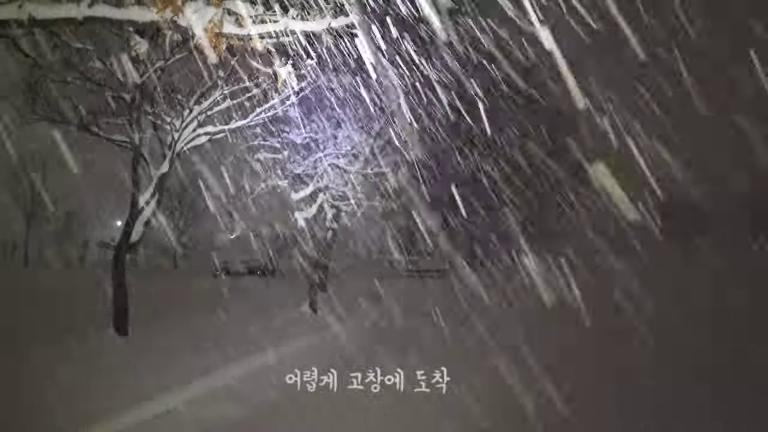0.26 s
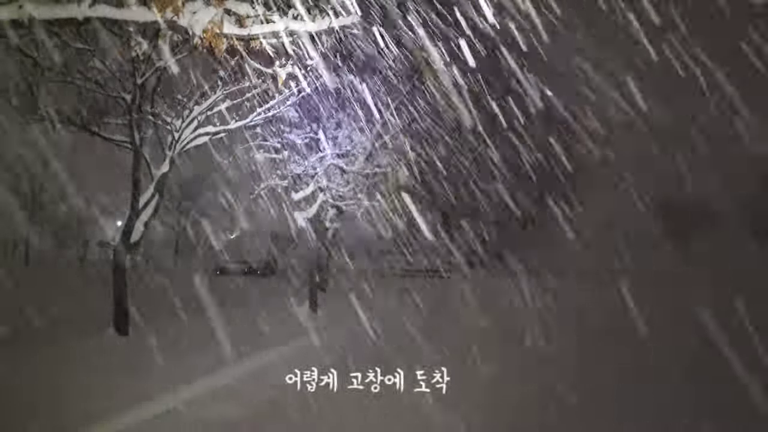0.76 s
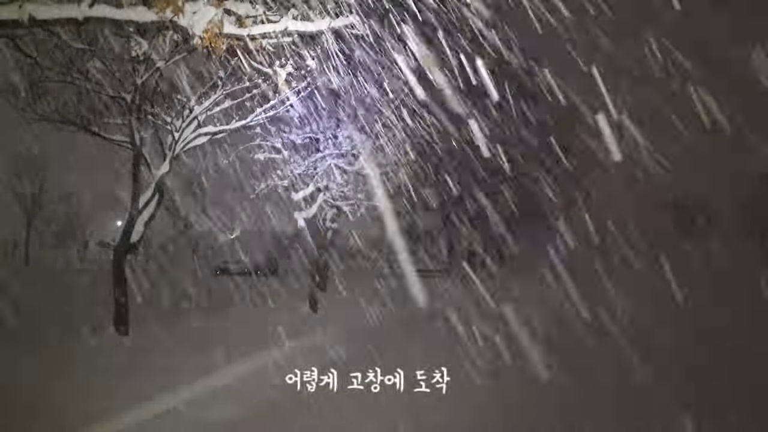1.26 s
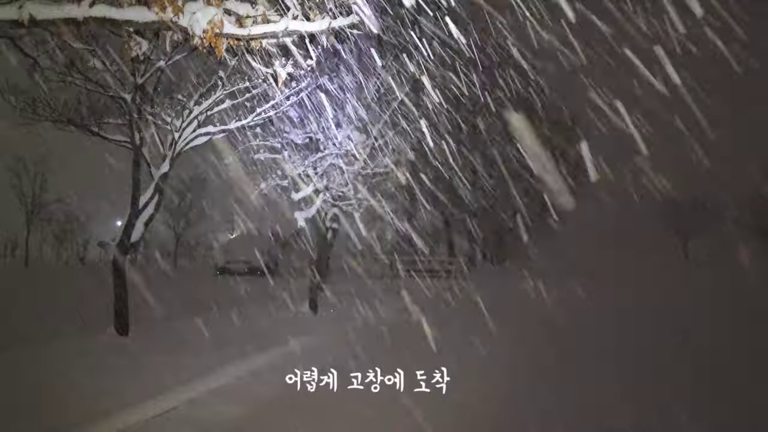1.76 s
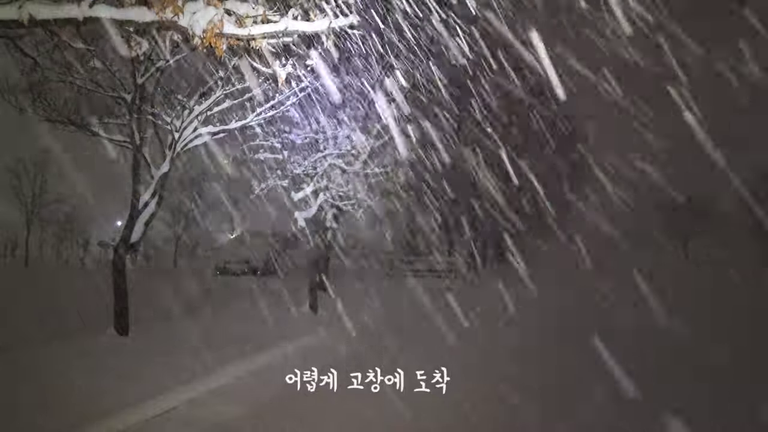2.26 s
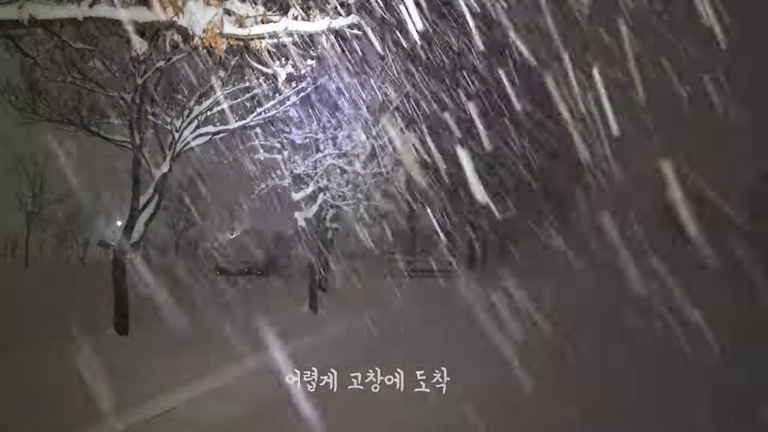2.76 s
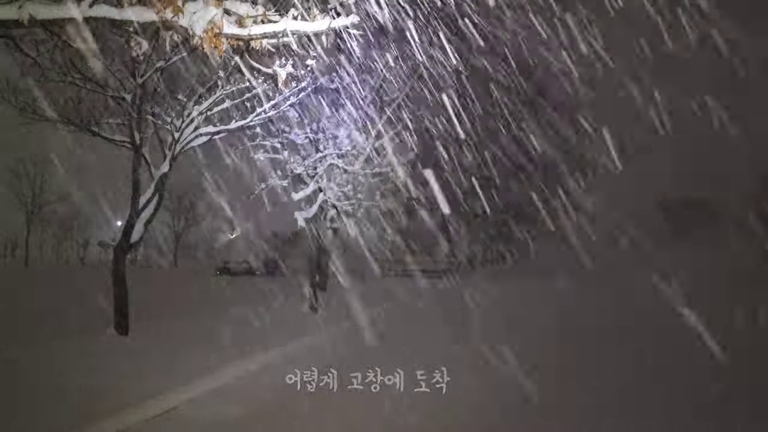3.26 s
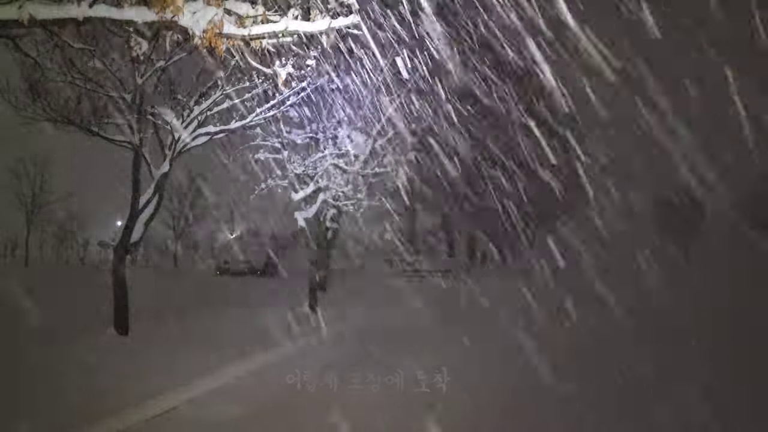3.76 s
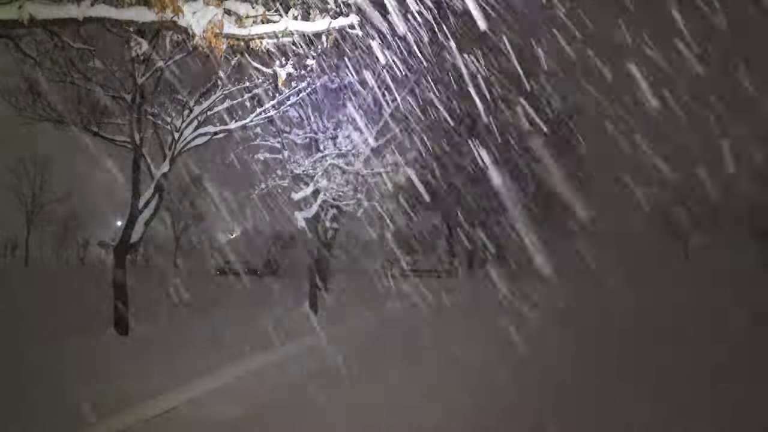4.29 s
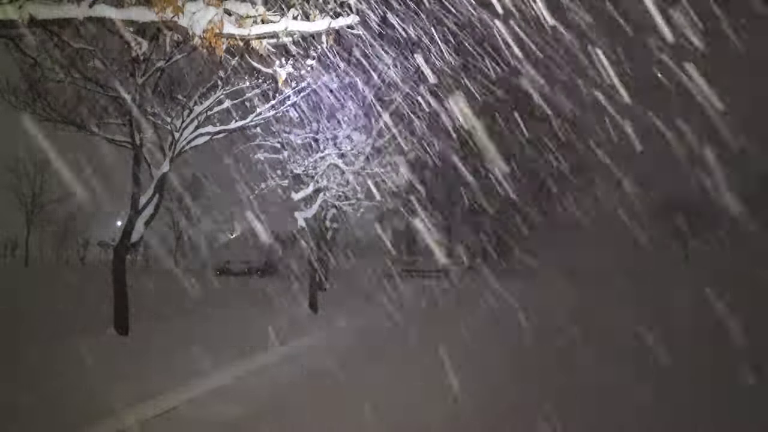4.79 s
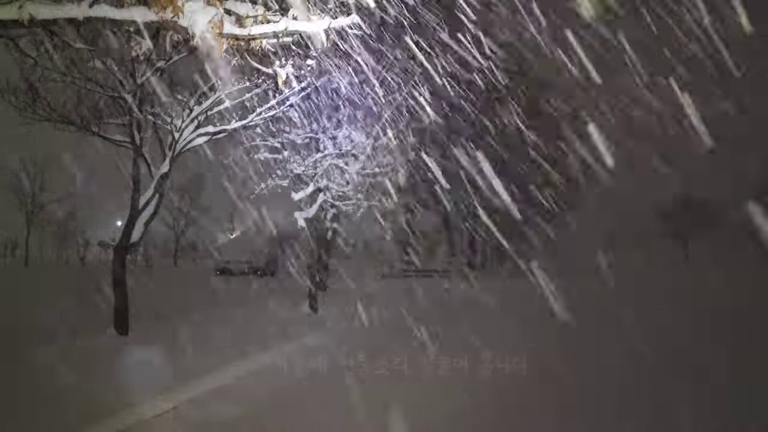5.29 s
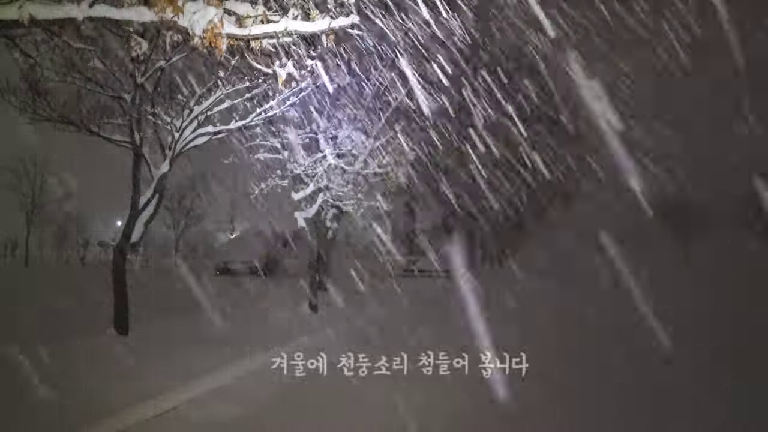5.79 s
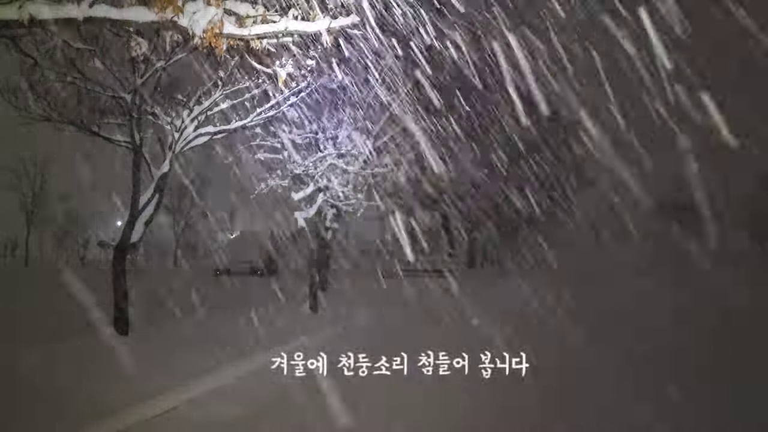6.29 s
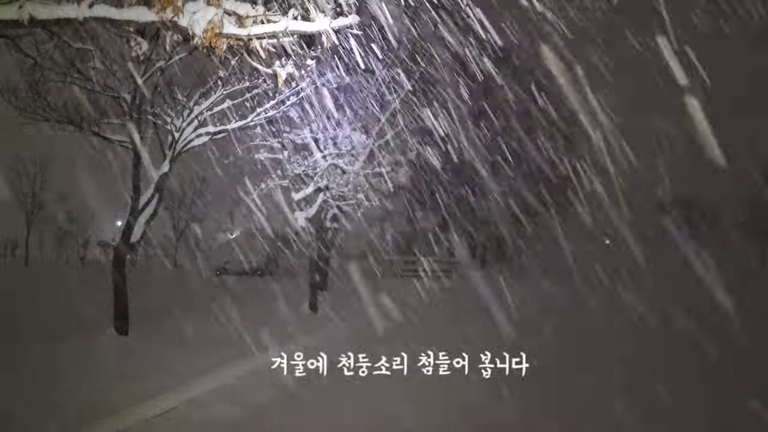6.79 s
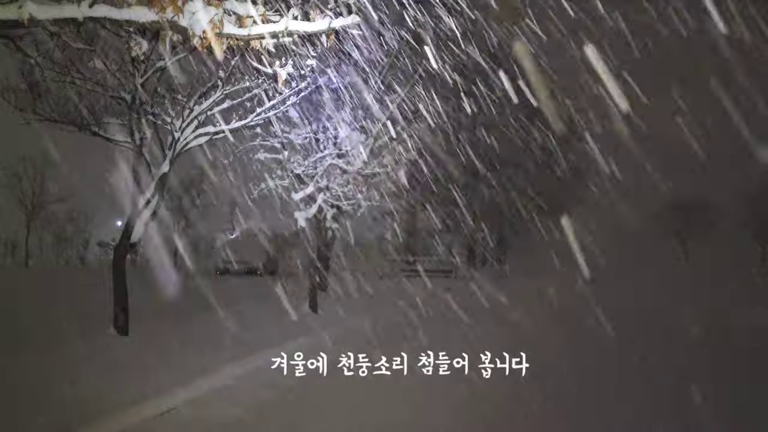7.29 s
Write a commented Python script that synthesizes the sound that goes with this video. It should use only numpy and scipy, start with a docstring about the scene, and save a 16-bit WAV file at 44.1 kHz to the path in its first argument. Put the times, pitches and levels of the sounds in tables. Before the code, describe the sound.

Icy pellets patter beside a faintly whining, rumbling idle; a sudden ragged clap of thunder breaks and fades in uneven, deepening peals.

```python
"""Thunder breaks over a snowy park at night and rolls away: coloured streams of random shocks, duller with
distance, under swinging claps and torn crackle. An engine, probably a parked car, idles to the left:
filtered noise and a firing tone, with fan resonances and thin whine tones. Snow hisses and ticks: noise,
short ringing grains and dry snaps. A light wind brushes the microphone: separate low noise at each port."""
import sys
import numpy as np
from scipy import signal
from scipy.fft import rfft, irfft, next_fast_len
from scipy.io import wavfile
from scipy.ndimage import uniform_filter1d, minimum_filter1d

SR = 44100
rng = np.random.default_rng(int(sys.argv[2]) if len(sys.argv) > 2 else 0)


def unload_wav(signal):
    """Save mono or channel-first audio to the path in sys.argv[1] as 16-bit WAV at rate SR, clipped to [-1, 1]."""
    wavfile.write(
        sys.argv[1],
        SR,
        np.round(np.clip(np.atleast_2d(signal).T, -1, 1) * 32767).astype(np.int16),
    )


N = 332909
TIME = np.arange(N) / SR
HZ = np.fft.rfftfreq(N, 1 / SR)

# wind spectrum: hz, gain_db
WIND_COLOUR = [(12, -0.5), (35, 6), (55, -12), (100, -11), (250, 1), (450, 5), (800, -42), (2000, -64)]
WIND_DB = -67.5

# hiss of falling snow: hz, gain_db
HISS_COLOUR = [(500, -29), (850, -7.5), (1350, -2.5), (1470, -1.5), (1600, -7.5), (1740, -5), (2140, -5.5),
               (2970, -9), (3400, -9), (5070, -15), (7050, -12), (7350, -8), (7700, -10.5), (10600, -18),
               (15500, -16)]
HISS_DB = -64.5
# snow tick spectrum: hz, gain_db
TICK_COLOUR = [(800, -11.5), (2300, -9.5), (3900, 5), (5200, -1.5), (7300, 1.5), (9000, 3), (10700, -11.5),
               (12000, -5.5), (15500, -14)]
# flurries of fine snow at set times: start_s, length_s, level_db
FLURRIES = [(0.155, 0.04, -63), (0.956, 0.11, -66), (1.427, 0.028, -67), (2.025, 0.034, -63),
            (2.25, 0.038, -67.5), (2.65, 0.068, -71), (2.798, 0.039, -62.5), (3.423, 0.029, -61),
            (5.238, 0.0095, -57), (5.402, 0.015, -65)]
SPRINKLE_DB, FLURRY_DB, FLURRY_SPREAD_DB, FLURRY_DECAY_S = -69.5, -62, 7, 0.016
GUST_S, GUST_WIDTH_S, GUST_DB = 1.07, 0.1, 1.5  # drives the fine snow harder for a moment
SNOW_EASE_DB_PER_S = 0.1
# large pellets landing close by: start_s, level_db (before trim and colour), pitch_hz,
# ring_db (re snap), pan_db (left minus right)
PELLETS = [(0.2104, -41, 7500, -18, 6), (0.2965, -42, 4670, -4, 0), (0.556, -45, 7200, -16, 11),
           (0.959, -44, 3300, -4, 1), (0.9705, -40, 4180, -5, 3), (1.0145, -45, 4500, -14, 1),
           (1.041, -49, 8400, -14, 8), (1.44, -44, 2980, -12, 1), (1.5062, -41.5, 3780, -2, 0),
           (1.7713, -39, 5800, -4, 0), (2.036, -45, 8000, -12, 10), (2.171, -44, 3080, -5, 4),
           (2.271, -52, 4200, -14, 8), (2.6806, -36.5, 3400, -2, 0), (2.817, -41, 4400, -3, 2),
           (3.413, -46, 6200, -14, 6), (3.559, -44, 4000, -16, 13), (3.5997, -41, 3900, -11, 7),
           (3.846, -43, 5900, -14, 9), (3.877, -42, 8300, -12, -1), (4.331, -45, 6400, -7, 8),
           (4.573, -55, 7450, -16, 9), (4.953, -47, 8200, -12, 6), (5.2325, -45, 3660, -7, 1),
           (5.248, -47, 4300, -11, 2), (5.35, -46, 7300, -20, 9), (5.413, -50, 2900, -14, 1),
           (6.146, -43, 3600, -8, 3), (6.745, -48, 3100, -16, 10), (7.0025, -36.5, 3600, -7, 0),
           (7.1, -45, 7070, -6, -2), (7.405, -38.5, 3620, -3, 0)]
# pellet snap spectrum: hz, gain_db
SNAP_COLOUR = [(800, -14), (2300, 3), (3900, 1), (5200, -1), (8000, 4.5), (10700, -10), (15500, -3)]
# small pellets, levels before trim and colour
SMALL_DB, SMALL_SPREAD_DB, SMALL_HZ, SMALL_OCTAVES, SMALL_RING_DB, SMALL_PAN_DB = -51, -4.5, 4860, 0.5, -12, 5

# exhaust rumble spectrum: hz, gain_db
EXHAUST_COLOUR = [(12, -72), (20, -25.5), (27, -44), (46, -10), (69, -1), (82, -6), (98, -15), (124, -13),
                  (139, -20), (172, -12.5), (265, -23), (294, -23), (363, -30), (403, -23.5), (460, -47.5),
                  (600, -80), (1010, -120)]
EXHAUST_DB = -41.04
# swells of the engine drone: centre_s, width_s, level_db
SURGES = [(0.19, 0.017, -45), (1.33, 0.032, -40), (1.43, 0.018, -43), (2.035, 0.073, -38),
          (2.785, 0.042, -36.5), (2.89, 0.029, -36.5), (3.27, 0.025, -39)]
FIRING_HZ, FIRING_DB = 65.34, -54.5
# fan resonances: pitch_hz, half_width_hz, gain_db
FAN_RESONANCES = [(565, 35, -0.5), (725.5, 60, -1), (978, 28, -7), (1230, 19, -11), (1486, 29, -1.5),
                  (1786, 28, -7), (2477, 34, -22.5), (2990, 15, -15.5)]
FAN_DB = -60.0
# whine of the spinning parts: pitch_hz, level_db (at the start)
WHINE = [(1682, -71.5), (1762, -67.5), (2485, -82.5), (2885, -82), (2966, -83), (3047, -75.5), (3208, -81),
         (3607, -78.5), (4007, -90)]
RUMBLE_LAG_S, FAN_LAG_S = 0.00022, 0.00037

STRIKE_S, HOLD_S = 3.789, 0.53  # first shock front; level held before the roll fades
# thunder from the near end of the channel: hz, gain_db
NEAR_COLOUR = [(22, -25), (65, -16), (150, 1.5), (250, -5.5), (305, -16), (405, 4.5), (490, -4.5),
               (640, -11), (890, -21.5), (985, -15), (1100, -21), (2400, -31), (3800, -47.5), (6000, -74)]
# thunder from the far end of the channel: hz, gain_db
FAR_COLOUR = [(22, -19), (65, -5), (125, 1), (165, -5.5), (255, -1.5), (315, -12), (405, -1.5), (590, -12),
              (760, -10.5), (950, -17), (1180, -20), (1450, -21), (1650, -28), (2100, -27.5), (3800, -51),
              (6000, -64.5)]
# hollow ring of the roar: time_s, pitch_hz
ROAR_PITCH = [(3.79, 462), (3.83, 402), (3.9, 434), (3.98, 387), (4.015, 487), (4.06, 383), (4.14, 406),
              (4.19, 450), (4.23, 426), (4.33, 431), (4.39, 400), (4.5, 435), (4.57, 376), (4.68, 430)]
# deepest rumble: level_db, fade_db_per_s
DEEP = (-44, 4.8)
# boom of the longest shocks: level_db, fade_db_per_s
BOOM = (-33.5, 6.15)
# low middle shocks: level_db, fade_db_per_s
BODY = (-36.5, 7.12)
# high middle shocks: level_db, fade_db_per_s
CRASH = (-40.5, 5.45)
# crackle of short shocks: level_db, fade_db_per_s
CRACKLE = (-51.5, 6.64)
BODY_SHARE, CRASH_SHARE = 0.19, 0.072  # share of the boom's swell; the rest follows the crackle
# branches whose shocks arrive together: start_s, length_s, deep_swell_db, boom_swell_db, crackle_swell_db
PEALS = [(3.793, 0.042, 9, 1.5, 3.5), (3.848, 0.074, 3, 6.5, 1.5), (3.934, .04, 4.5, -1, 0.5),
         (4.008, 0.078, 4, 4, 3.5), (4.088, 0.076, 9, 3.5, 4.5), (4.177, 0.035, 13, 12.5, 3),
         (4.211, 0.037, 12, 6.5, 7.5), (4.263, 0.088, 5, 6, 2), (4.353, 0.03, 0, 7.5, 4.5),
         (4.425, 0.03, 0, -1.5, -8), (4.516, 0.04, 13, 5.5, 2.5), (4.64, 0.049, 6, 9, 4),
         (4.728, 0.1, 10, 8, 3.5), (4.88, 0.038, 8, 11.5, 3), (4.963, 0.077, 8, 10.5, 4.5),
         (5.06, 0.069, 9, 9.5, 3.5), (5.178, 0.071, -13, 6.5, 0), (5.317, 0.27, 3, 1.5, 1.5),
         (5.647, 0.096, -1, 13, 4), (5.768, 0.11, 12, 9.5, 3.5), (5.891, 0.085, 15, 6, 2),
         (5.994, .04, 12.5, 2, 2), (6.087, 0.07, 10, 1, 3.5), (6.18, 0.036, 17, 2, 3),
         (6.255, 0.038, 15, -3, 1), (6.34, 0.1, 10.5, 3.5, 1.5), (6.444, 0.1, 4, 3, 2),
         (6.59, 0.052, 6, -1, 1.5), (6.95, 0.19, 1, 4.5, 1.5), (7.176, 0.046, 2, 10, 2.5),
         (7.278, 0.037, 7, 5, 2), (7.346, 0.021, 10, 15.5, 6), (7.419, 0.091, 1, 16, 3)]
PEAL_ATTACK_S, PEAL_RELEASE_S = 0.016, 0.021
# level changes between the peals, mostly lulls: centre_s, width_s, change_db
LULLS = [(3.99, 0.031, -2.5), (4.09, 0.014, -0.5), (4.5, 0.033, -2), (4.62, .025, -0.5), (4.865, 0.024, 2),
         (4.948, 0.012, 4.5), (5.045, .012, -2), (5.515, .015, -1.5)]
# tearing crackle of many sharp fronts: start_s, length_s, level_db
TEARS = [(3.802, 0.022, -48), (3.83, 0.064, -49), (4.016, 0.018, -46), (4.06, 0.013, -52),
         (4.094, 0.08, -41.5), (4.196, 0.0082, -38), (4.215, 0.047, -37), (4.655, .02, -39.5),
         (4.778, 0.029, -38), (4.917, 0.015, -43), (4.995, .04, -54), (5.764, 0.11, -50), (6.1, 0.055, -53)]
# tearing crackle spectrum: hz, gain_db
TEAR_COLOUR = [(400, -14), (1000, 18), (2200, 1), (3300, -14), (4300, -29), (6000, -39), (9000, -59)]
# heavy shock fronts: start_s, level_db (before trim, echo and filter), pitch_hz, swell_s
CLAPS = [(3.793, -26, 466, 0.0034), (3.816, -19, 190, 0.0018), (3.849, -21, 126, 0.0051),
         (3.881, -19, 133, 0.0046), (4.014, -24, 570, 0.0037), (4.028, -21.5, 448, 0.0067),
         (4.055, -20.5, 403, 0.008), (4.106, -15, 400, 0.011), (4.128, -16, 412, 0.0094),
         (4.194, -11.5, 141, 0.0044), (4.214, -12, 160, 0.0069), (4.383, -19, 390, 0.0043),
         (4.653, -17.5, 208, 0.0077), (4.732, -23, 420, 0.0035), (4.771, -19, 220, 0.0068),
         (4.794, -14.5, 237, 0.0063), (4.898, -25, 190, 0.0022), (4.910, -14.5, 239, 0.0046),
         (4.969, -20, 170, 0.0015), (5.014, -23, 330, 0.0028), (5.112, -19.5, 240, 0.0044),
         (5.668, -23, 191, 0.01), (5.718, -21.5, 163, 0.004), (5.768, -25.5, 680, 0.0023),
         (5.829, -19, 175, 0.0026), (5.954, -29, 202, 0.0065), (6.285, -36, 380, 0.0056),
         (7.363, -28, 129, 0.0059), (7.474, -34.5, 229, 0.012)]


def gain_of(db):
    """Decibels to amplitude."""
    return 10 ** (np.asarray(db) / 20)


def evened(x):
    """Scales to an rms of one."""
    return x / np.sqrt(np.mean(x ** 2) + 1e-20)


def colour(points):
    """Gain at every frequency, from (hz, gain_db) points joined on a log axis."""
    hz, db = np.transpose(points)
    return gain_of(np.interp(np.log(HZ + 1), np.log(hz + 1), db))


def filtered(x, gain):
    """Applies a gain given at every frequency."""
    size = next_fast_len(N + 4096)
    padded_gain = np.interp(np.fft.rfftfreq(size, 1 / SR), HZ, gain)
    return irfft(rfft(x, size) * padded_gain, size)[..., :N]


def below(hz):
    """Gain of a steep crossover that keeps what lies under hz."""
    return 1 / (1 + (HZ / hz) ** 8)


def drift(per_s):
    """Smooth random curve of rms one that changes about per_s times a second."""
    return evened(filtered(rng.standard_normal(N), np.exp(-(HZ / per_s) ** 2)))


def steadied(x, span_s):
    """Divides out the running level, leaving the grain finer than span_s."""
    size = max(int(span_s * SR), 2)
    power = uniform_filter1d(uniform_filter1d(x ** 2, size), size)
    return x / np.sqrt(abs(power) + 1e-20)


def impacts(per_s, spread_db):
    """Random clicks of either sign; a few are much larger, or smaller if spread_db is negative."""
    size = gain_of(spread_db * np.minimum(rng.exponential(1, N), 4))
    return size * rng.choice([-1, 1], N) * (rng.random(N) < per_s / SR)


def add(mix, s, sound):
    """Adds a sound to the mix at time s."""
    part = mix[..., max(round(s * SR), 0):][..., :sound.shape[-1]]
    part += sound[..., :part.shape[-1]]


def held(s, length, attack_s, release_s):
    """Envelope that rises at time s, holds and decays exponentially."""
    rise = np.clip((TIME - s) / attack_s, 0, 1)
    return rise * np.exp(-np.maximum(TIME - s - length, 0) / release_s)


def bump(s, width):
    """Smooth swell centred on time s."""
    return np.exp(-((TIME - s) / width) ** 2)


def panned(db):
    """Left and right gains that differ by db."""
    return gain_of([[db / 2], [-db / 2]])


def resonate(x, hz, width_hz):
    """Resonance of gain one that follows the curve hz: shift to zero, smooth, shift back."""
    turn = np.exp(2j * np.pi * np.cumsum(hz) / SR)
    r = np.exp(-np.pi * width_hz / SR)
    return 2 * (turn * signal.lfilter([1 - r], [1, -r], x / turn + 1e-18)).real


def from_left(x, lag_s):
    """A sound from the left reaches the right ear a little later."""
    return np.array([x, np.interp(TIME - lag_s, TIME, x)])


def wind(gust_db=2):
    """A faint, lumpy breeze brushes each port with its own noise."""
    brush = evened(filtered(rng.standard_normal((2, N)), colour(WIND_COLOUR)))
    return gain_of(WIND_DB + gust_db * drift(per_s=3)) * brush


def flurries(count=44, attack_s=0.004):
    """Strength of the fine snow: steady sprinkle, flurries at set times, brief ones at uneven intervals."""
    power, t = np.full(N, gain_of(SPRINKLE_DB) ** 2), np.arange(SR // 4) / SR
    starts = (np.arange(count) + rng.uniform(-1.1, 1, count)) * TIME[-1] / count
    for s, size in zip(starts, rng.uniform(-1, 1, count)):
        burst = gain_of(FLURRY_DB + FLURRY_SPREAD_DB * size) * np.exp(-t / FLURRY_DECAY_S)
        add(power, s, burst ** 2)
    for s, length, db in FLURRIES:
        power += (gain_of(db) * held(s, length, attack_s, FLURRY_DECAY_S)) ** 2
    return np.sqrt(power)


def snow(grains_per_s=600, spread_db=3, clump_db=2, grain_s=0.00074, pan_db=2.0, ring=0.18, ring_s=0.01,
         fine_db=2, hiss_top_db=-2, breeze_db=2.0, patter_db=1.5):
    """Far flakes blur into a soft hiss; near grains crunch and ring in little flurries."""
    top = 1 - below(10000)
    hiss_gain = colour(HISS_COLOUR) * gain_of(hiss_top_db * top)
    hiss = evened(filtered(rng.standard_normal((2, N)), hiss_gain))
    hiss = hiss * gain_of(HISS_DB + breeze_db * drift(per_s=23) + patter_db * drift(per_s=110))
    clumps, t = gain_of(clump_db * drift(per_s=40)), np.arange(500) / SR
    grains = np.zeros((2, N))
    spots_hz = np.linspace(3300, 9500, 18) + rng.uniform(-180, 180, 18)
    for hz in spots_hz:
        # each landing spot sounds different, and different at each ear
        crunch = rng.standard_normal((2, len(t))) * np.exp(-t / grain_s)
        crunch += ring * np.sin(2 * np.pi * (hz * t + rng.random((2, 1)))) * np.exp(-t / ring_s)
        landings = clumps * impacts(grains_per_s / len(spots_hz), spread_db)
        grains += signal.oaconvolve(landings[None], crunch, axes=1)[:, :N]
    grains = evened(filtered(grains, colour(TICK_COLOUR) * gain_of(fine_db * top)))
    return (hiss + flurries() * grains) * panned(pan_db)


def crystals(level_db=-57.0, hits_per_s=13, flurry_hits_per_s=200, spread_db=3, bright_hz=5000, pan_db=6,
             flurry_share=0.8, attack_s=0.004):
    """Single ice crystals strike each port with tiny dry clicks, thickest in the flurries at set times."""
    hits = np.array([impacts(hits_per_s, spread_db) for port in range(2)])
    in_flurry = sum(held(s, length, attack_s, FLURRY_DECAY_S) for s, length, db in FLURRIES)
    flurry_hits = np.array([impacts(flurry_hits_per_s, spread_db) for port in range(2)])
    hits += flurry_share * in_flurry * flurry_hits
    return gain_of(level_db) * filtered(hits, 1 - below(bright_hz)) * panned(pan_db)


def small_pellets(count=24):
    """Random landings of lighter pellets, in the columns of PELLETS."""
    size, pitch, side = np.clip(rng.standard_normal((count, 3)), -1, 1).T
    times = (np.arange(count) + rng.random(count)) * TIME[-1] / count
    levels_db = SMALL_DB + SMALL_SPREAD_DB * size
    pitches_hz = SMALL_HZ * 2 ** (SMALL_OCTAVES * pitch)
    return list(zip(times, levels_db, pitches_hz, np.full(count, SMALL_RING_DB), SMALL_PAN_DB * side))


def pellets(trim_db=-1, snap_s=0.000075, ring_s=0.0013, crunch_db=-15, crunch_s=0.0018, crumbs_db=-27,
            crumbs_s=0.015):
    """A pellet lands with one dry snap, briefly rings what it hits, and its crumbs patter after it."""
    out, t = np.zeros((2, N)), np.arange(2048) / SR
    crumble = gain_of(crunch_db) * np.exp(-t / crunch_s) + gain_of(crumbs_db) * np.exp(-t / crumbs_s)
    for s, db, hz, ring_db, pan in PELLETS + small_pellets():
        decay = np.exp(-t / snap_s) + gain_of(ring_db) * np.exp(-t / ring_s)
        knock = np.cos(2 * np.pi * hz * t) * decay
        tick = knock / knock[0] + crumble * rng.standard_normal((2, len(t)))
        add(out, s, gain_of(db + trim_db) * panned(pan) * tick)
    return filtered(out, colour(SNAP_COLOUR))


def fan(waver=0.00124, blur_hz=8, flutter_db=2.0, echo_db=-9, pan_db=3.0, ease_db_per_s=0.4, sway=0.012,
        swell_db=1.64):
    """Cooling air excites resonances that sway and swell in the wind; spinning parts whine thinly."""
    air = np.zeros((3, N))  # one direct path, two echo paths
    swayed_s = np.cumsum(1 + sway * drift(per_s=6)) / SR
    for hz, width, db in FAN_RESONANCES:
        resonance = gain_of(db) / (1 + ((HZ - hz) / width) ** 2) ** 1.54
        air += filtered(rng.standard_normal((3, N)), resonance) * gain_of(swell_db * drift(per_s=3.6))
    air = gain_of(FAN_DB) * evened(np.array([np.interp(swayed_s, TIME, path) for path in air]))
    shaft_s, whine = np.cumsum(1 + waver * drift(per_s=5.1)) / SR, np.zeros(N)
    for hz, db in WHINE:
        turns = hz * shaft_s + np.cumsum(blur_hz * drift(per_s=29.0)) / SR
        level_db = db + flutter_db * drift(per_s=18) - ease_db_per_s * TIME
        whine += gain_of(level_db) * np.sin(2 * np.pi * turns)
    direct = from_left(air[0] + np.sqrt(2) * whine, FAN_LAG_S) * panned(pan_db)
    return direct + gain_of(echo_db) * air[1:]


def exhaust(hunting=0.032, flutter_db=4):
    """Lumpy exhaust noise around an uneven firing tone that now and then swells into a drone."""
    noise = filtered(rng.standard_normal(N), colour(EXHAUST_COLOUR))
    puffs = gain_of(EXHAUST_DB) * steadied(noise, span_s=0.18)
    turns = np.cumsum(FIRING_HZ * (1 + hunting * drift(per_s=11.0))) / SR
    surges = sum(gain_of(db) * bump(s, width) for s, width, db in SURGES)
    strength = gain_of(FIRING_DB + flutter_db * drift(per_s=6.9)) + surges
    firing = strength * np.sqrt(2) * np.sin(2 * np.pi * turns)
    return from_left(puffs + firing, RUMBLE_LAG_S)


def tears(cracks_per_s=450, spread_db=1.5, attack_s=0.0014, release_s=0.016, scatter_s=0.003):
    """Ragged bursts of separate sharp cracks, each smeared a little by the trees."""
    bursts = sum(gain_of(db) * held(s, length, attack_s, release_s) for s, length, db in TEARS)
    t = np.arange(SR // 100) / SR
    cracks = np.zeros(N)
    for path in rng.standard_normal((4, len(t))) * np.exp(-t / scatter_s):
        cracks += signal.oaconvolve(impacts(cracks_per_s / 4, spread_db), path)[:N]
    return bursts * steadied(filtered(cracks, colour(TEAR_COLOUR)), span_s=0.037)


def claps(soft_hz=1300, sag=0.039, steep=0.24, uneven=0.063, trim_db=-1, echo_db=-11, echo_s=0.037):
    """Broadside channel merges its shocks into one steep push of a few cycles; trees throw it back."""
    out, t = np.zeros(N), np.arange(SR // 10) / SR
    waver = 1 + uneven * drift(per_s=88)
    for s, db, hz, swell_s in CLAPS:
        age = t / swell_s
        pitch_hz = hz * np.exp(-sag * (age - 1)) * np.interp(s + t, TIME, waver)
        turn = 2 * np.pi * np.cumsum(pitch_hz) / SR
        swell = (age * np.exp(1 - age)) ** 2
        wave = swell * np.sin(turn + steep * swell * np.sin(turn))
        add(out, s, gain_of(db + trim_db) * wave / abs(wave).max())
    late = TIME[:SR // 2] / echo_s
    trees = rng.standard_normal(len(late)) * late * np.exp(-late)
    echo = signal.oaconvolve(out, trees / np.linalg.norm(trees))[:N]
    return filtered(out + gain_of(echo_db) * echo, 1 / (1 + (HZ / soft_hz) ** 2))


def peals(lull_share=0.53):
    """Swells in dB of deep rumble, boom and crackle: up in peals; lulls move the crackle least."""
    swell = np.zeros((3, N))
    for s, length, *swell_db in PEALS:
        swell = np.maximum(swell, np.outer(swell_db, held(s, length, PEAL_ATTACK_S, PEAL_RELEASE_S)))
    lulls = sum(db * bump(s, width) for s, width, db in LULLS)
    return swell + np.outer([1, 1, lull_share], lulls)


def roll(shocks_per_s=2000, spread_db=-0.5, edge_db=-13, steepen=0.65, rise_s=0.0054, air_hz=2400,
         air_db_per_s=2, near_s=4.13, far_s=5.05, lumps_db=0.4, roar_db=3, roar_width_hz=110,
         wander_db_per_s=0.15):
    """Each kink of the lightning channel sends a small shock; they arrive as one dense, swelling stream."""
    shocks = impacts(shocks_per_s, spread_db)
    roar_hz = np.interp(TIME, *np.transpose(ROAR_PITCH))
    roar = resonate(impacts(shocks_per_s, spread_db), roar_hz, roar_width_hz)
    roar = resonate(roar, roar_hz, roar_width_hz)
    near = filtered(shocks, colour(NEAR_COLOUR)) + gain_of(roar_db) * roar
    # sound comes from ever farther up the channel, and the air takes its treble
    distance = np.clip((TIME - near_s) / max(far_s - near_s, .01), 0, 1)
    stream = (1 - distance) * near + distance * filtered(shocks, colour(FAR_COLOUR))
    dull = filtered(stream, 1 / (1 + (HZ / air_hz) ** 4))
    stream = dull + (stream - dull) * gain_of(-air_db_per_s * np.maximum(TIME - STRIKE_S, 0))
    # each size of shock swells with the peals and fades at its own pace
    fading_s = np.maximum(TIME - STRIKE_S - HOLD_S, 0)
    deep, low, high = peals()
    swells = [(DEEP, deep)]
    for size, share in zip([BOOM, BODY, CRASH, CRACKLE], [1, BODY_SHARE, CRASH_SHARE, 0]):
        swells.append((size, share * low + (1 - share) * high))
    levels = []
    for (db, fade), swell in swells:
        wander = wander_db_per_s * fading_s * drift(per_s=27)  # wind, more with distance
        levels.append(db - fade * fading_s + swell + wander)
    # strong shocks keep steeper fronts: the loudest crackle gains a bright edge
    crackle = levels[-1]
    levels.append(crackle + steepen * (crackle - crackle.max()) + edge_db)
    splits = [below(hz) for hz in (105, 300, 650, 1500, 3300)]
    bands = np.diff([0 * HZ, *splits, 1 + 0 * HZ], axis=0)
    out = np.zeros(N)
    for band, level in zip(bands, levels):
        out += gain_of(level) * steadied(filtered(stream, band), span_s=0.056)
    return out * gain_of(lumps_db * drift(per_s=17)) * np.clip((TIME - STRIKE_S) / rise_s, 0, 1)


def scene():
    """Thunder ahead, engine to the left, snow and light wind all around."""
    snowfall_db = GUST_DB * bump(GUST_S, GUST_WIDTH_S) - SNOW_EASE_DB_PER_S * (TIME - TIME.mean())
    weather = wind() + gain_of(snowfall_db) * snow() + crystals() + pellets()
    engine = fan() + exhaust()
    thunder = tears() + claps() + roll()
    return weather + engine + thunder


def record(dry, right_top_db=-3, ceiling_db=-10, edge_hz=15750):
    """Right port duller at the very top; a limiter rounds off the loudest claps; then a band limit."""
    top = 1 - below(10500)
    ports = np.array([dry[0], filtered(dry[1], gain_of(right_top_db * top))])
    room = np.minimum(gain_of(ceiling_db) / (abs(ports).max(axis=0) + 1e-9), 1)
    ports = ports * uniform_filter1d(minimum_filter1d(room, size=400), size=400)
    band_limit = signal.firwin(511, edge_hz, window=("kaiser", 9), fs=SR)
    return signal.oaconvolve(ports, band_limit[None], "same")


dry = scene()
out = record(dry)
unload_wav(out)
```